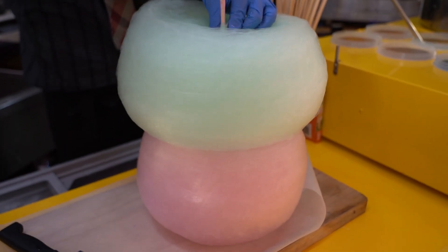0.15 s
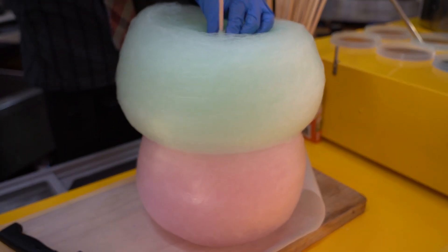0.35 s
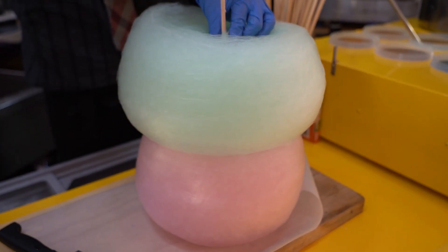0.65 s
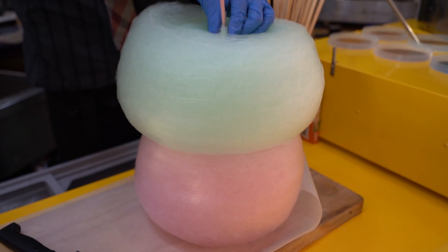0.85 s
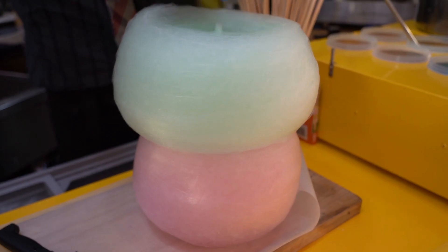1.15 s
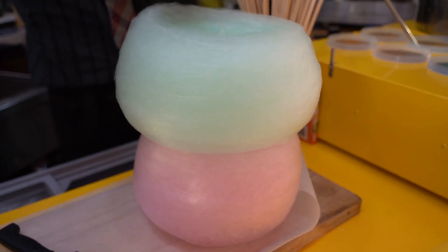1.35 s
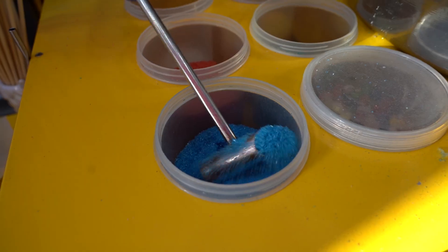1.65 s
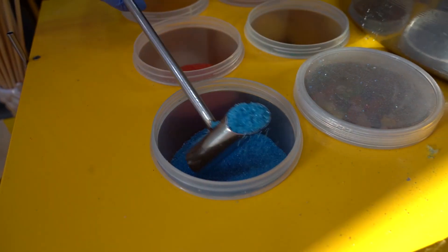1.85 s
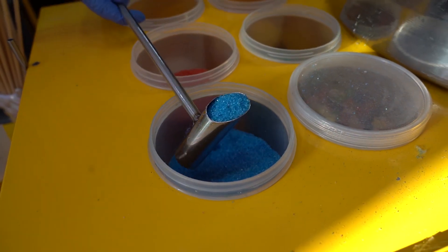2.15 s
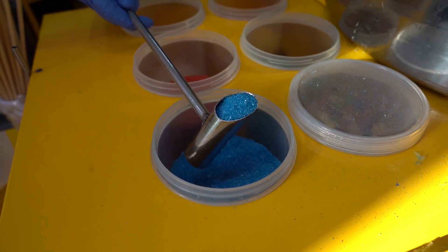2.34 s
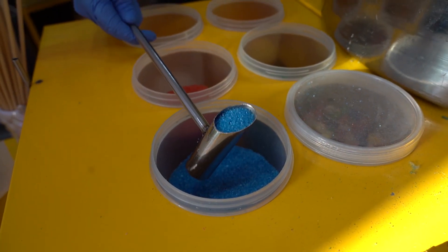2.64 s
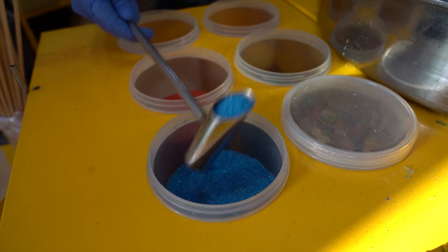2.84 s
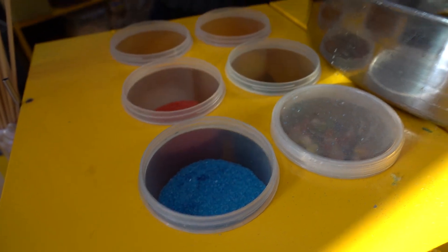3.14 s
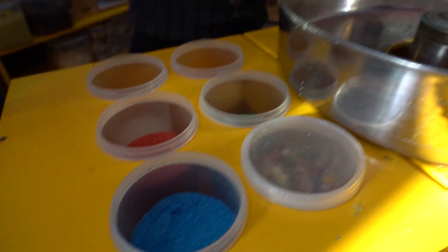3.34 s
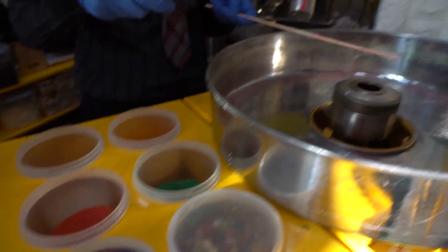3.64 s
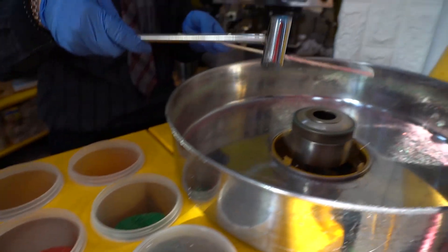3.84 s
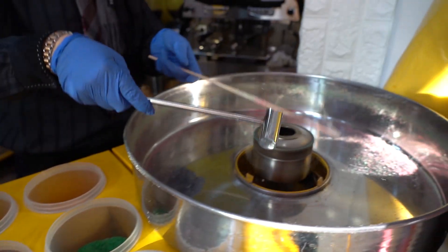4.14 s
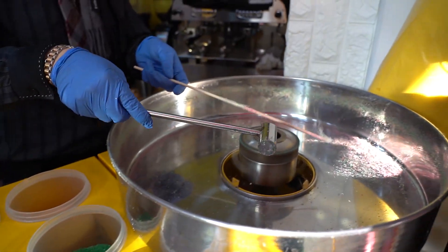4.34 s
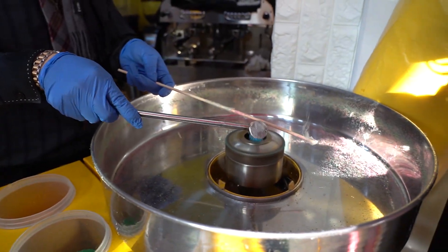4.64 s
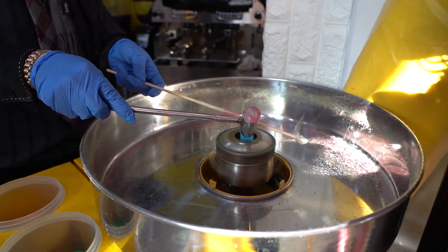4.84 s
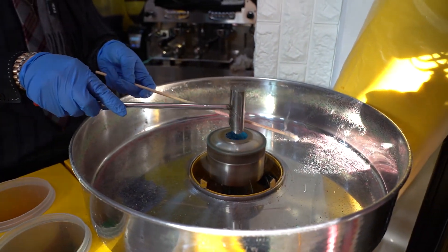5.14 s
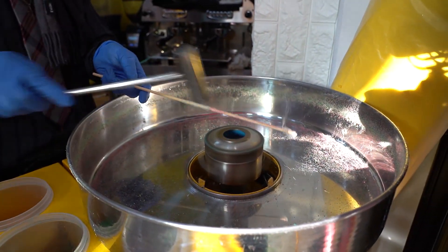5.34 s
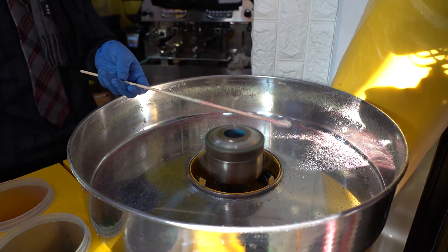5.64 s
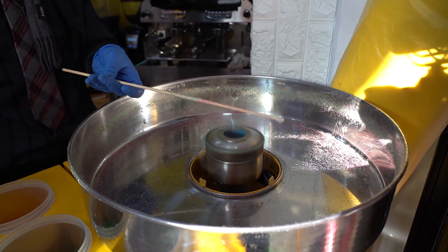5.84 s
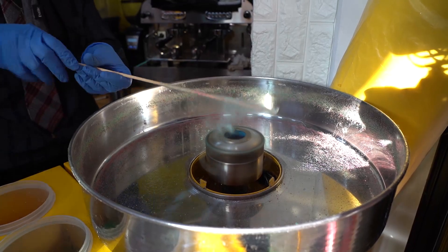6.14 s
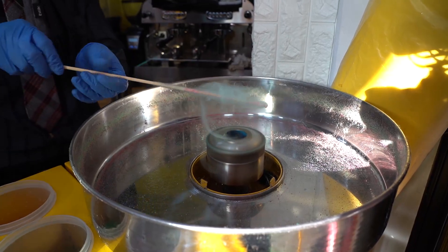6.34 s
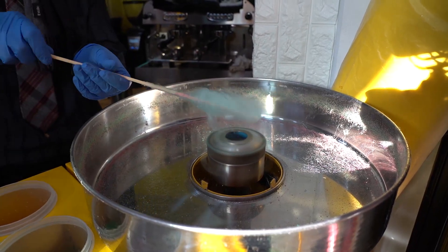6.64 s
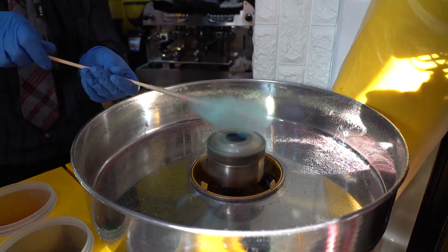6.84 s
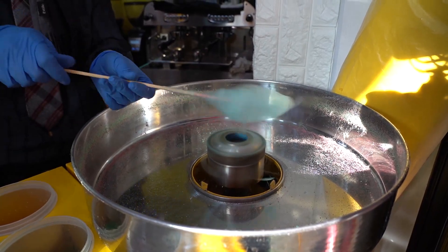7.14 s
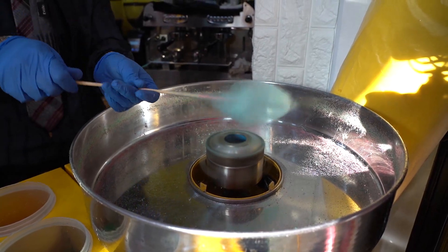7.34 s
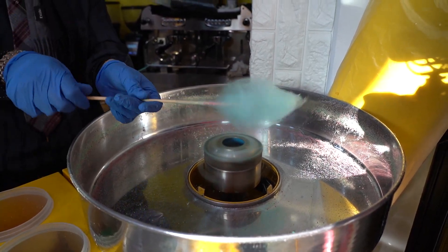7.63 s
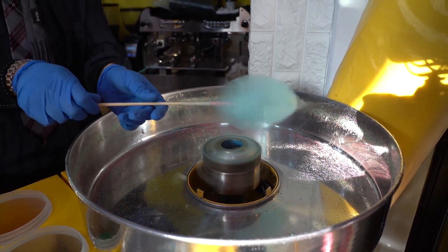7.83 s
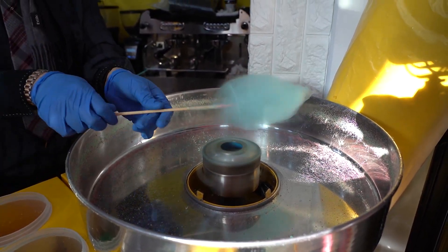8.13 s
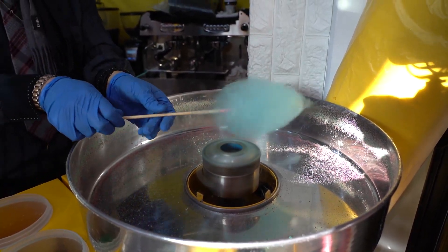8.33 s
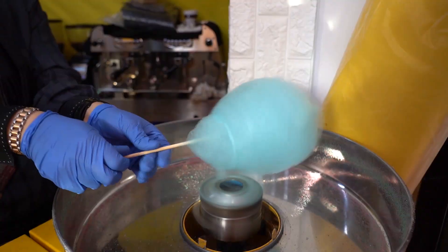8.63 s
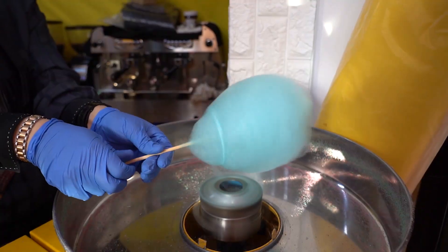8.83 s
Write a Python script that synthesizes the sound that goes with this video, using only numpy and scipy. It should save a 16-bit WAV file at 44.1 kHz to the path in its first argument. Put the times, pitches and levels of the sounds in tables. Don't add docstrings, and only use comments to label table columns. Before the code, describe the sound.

A thin, hissing whir with faint high whines runs throughout, distant at first and nearer in steps. Four hollow knocks come quickly, then small gritty clicks and one overloaded snap. Crystals patter into spinning metal, swelling to a short rush; a dull clunk follows. The machine spins on to the end, over soft stall rumble and mains hum, centred in the stereo picture.

```python
import sys
import numpy as np
from scipy import signal
from scipy.fft import rfft, irfft, next_fast_len
from scipy.io import wavfile
from scipy.ndimage import uniform_filter1d, map_coordinates

SR = 44100
rng = np.random.default_rng(int(sys.argv[2]) if len(sys.argv) > 2 else 0)


def materialize(psi):
    bounded = np.clip(np.atleast_2d(psi).T, -1, 1)
    quanta = np.round(bounded * 32767).astype(np.int16)
    wavfile.write(sys.argv[1], SR, quanta)


def gain_from_db(level_db):
    decades = np.asarray(level_db, float) / 20
    return 10 ** decades


N = 396018

# time_s, speed_rev_per_s
SPIN = [(0, 54.02), (3.5, 53.81), (4.6, 53.97), (4.9, 53.93), (5.27, 52.9)]
FREE_REV_PER_S, RECOVER_S, LAST_REV_PER_S = 55.08, 1.1, 54.51
# arrival_s, move_s
MOVES = [
    (1.66, .004),
    (3.7, .45),
    (5.2, .3),
    (6.6, .6),
    (8.497, .004),
]
CUT_S, CUT_FADE_IN_S, CUT_FADE_OUT_S = 1.657, 0.016, 0.007
# time_s, level_db
NEAR = [(0, -52), (1.65, -49.5), (1.67, -42), (3, -40.5), (3.6, -38), (8.98, -38.5)]
# freq_hz, density_db_per_hz
WHIR_COLOUR = [
    [(1500, -10), (2090, -8), (2840, -22), (3070, -8), (3550, -24), (3920, 2), (6210, -1), (15600, -19)],
    [(1500, -6.5), (2600, -10), (3520, -2), (4320, -1.5), (5800, -3.5), (8170, -11.5), (12500, -16),
     (15600, -21)],
    [(1500, -14.5), (2840, -8.5), (4120, -5), (5110, .5), (6030, -8.5), (11400, -9.5), (12500, -8),
     (15600, -18)],
    [(1500, -16.5), (4490, -7), (4860, -2), (5630, -5.5), (6090, -13.5), (7260, -13.5), (11000, -12.5),
     (15600, -17.5)],
    [(1500, -12), (2450, -13.5), (2920, -7), (3920, -4), (5060, -1.5), (6500, -10), (12700, -10),
     (15600, -15)],
    [(1500, -15), (2450, -14), (2950, -8.5), (4810, -3), (6780, -7), (7260, -11.5), (12300, -8.5),
     (15600, -18)],
]
# freq_hz, width_hz, level_db
WHIR_PEAKS = [
    [(7180, 41, -7), (7750, 24, 3), (9120, 29, 3), (9500, 28, 3), (12200, 39, -6)],
    [(6010, 28, -13), (6800, 20, 2), (9100, 25, 10), (11640, 23, -10), (11800, 24, -8)],
    [(6690, 32, 0.56), (7800, 37, -1), (7860, 32, -1), (9200, 170, 0.19), (11000, 91, -2), (12700, 63, -2)],
    [(6800, 78, 1), (8400, 58, -5), (9150, 43, 3), (9970, 52, 2), (12400, 73, 0), (12700, 66, -2)],
    [(6800, 36, 6), (7740, 140, -6), (9500, 46, 1), (10200, 180, -2), (10900, 80, -6), (12500, 500, -2),
     (13200, 62, -8)],
    [(6800, 35, -4), (7800, 31, -1), (9000, 26, -7), (9800, 110, 1), (11300, 34, 7), (12500, 45, -4)],
]
# freq_hz, density_db_per_hz
WHIR_FOOT = (840, -40)
# order_per_rev, level_db
WHINES = [
    [(56, -57), (72, -59), (83, -60), (91, -59), (106, -58.5)],
    [(63, -57), (78, -53), (83, -47), (91, -53), (99, -56), (107, -56)],
    [(56, -48), (91, -46.5), (92, -46.5), (95, -53), (98, -49), (103, -54)],
    [(88, -52), (91, -45), (92, -54), (106, -55), (183, -57)],
    [(55, -48), (75, -46), (87, -52), (90, -51), (92, -52), (98, -53)],
    [(75, -49.5), (83, -50), (85, -49), (87, -52), (90, -49)],
]
# order_per_rev, level_db
LOW_ORDERS = [(2, -56), (3, -53), (4, -55), (5, -55.5), (6, -55.5), (8, -58.5), (25, -61)]
THROB_DB, LOPSIDED_DB, EVEN_OUT_S = 0.8, 2.5, 0.4

# start_s, length_s, level_db, brightness_db
RASPS = [
    (3.433, .004, -17.5, 0.5),
    (3.4525, 0.0052, -18, 0.5),
    (3.469, 0.0084, -17.5, -6),
    (3.488, 0.0071, -23, -1),
]
# freq_hz, width_hz, level_db
RASP_BODY = [(3950, 1100, 2.5), (5640, 1900, 2.5), (8700, 2000, -5.5), (13000, 5000, -12)]
RASP_T60_S, LEAD_S, LEAD_LENGTH_S, LEAD_DB = 0.012, 0.004, 0.002, -5
SNAP_S, SNAP_DB, SNAP_LENGTH_S, SNAP_T60_S = 3.5445, -0.5, 0.0017, 0.0095
ECHO_DELAY_S, ECHO_DB, ECHO_T60_S = 0.00113, -16.5, 0.18
# freq_hz, density_db_per_hz
SNAP = [(500, -45), (900, -27), (1400, -4), (2100, -1.5), (2800, -15), (3700, 1.5), (4600, -3.5),
        (5800, -4), (8500, -11), (12600, -17.5), (16000, -20)]
# freq_hz, density_db_per_hz
SNAP_ECHO = [(470, -54), (800, -22), (1200, -22), (1700, -9), (2950, -10), (3600, -0.5), (4570, -7),
             (5510, 1.5), (6650, -10.5), (14800, -17), (16000, -27)]

# start_s, peak_db, tick_over_thud_db, boom_db, rattle_db
KNOCKS = [
    (2.3283, -21.5, -10, -1, -27),
    (2.4784, -18.5, -11, 0, -27),
    (2.632, -13.5, -12.5, -2, -27),
    (2.776, -15, -10.5, -0.5, -26.5),
    (5.7456, -12, -11, -6.5, -26),
    (5.8232, -29, -6, -6, -19),
]
# freq_hz, level_db, t60_s
TUB = [(180, -6.5, 0.034), (223, 8.5, 0.026), (315, -3, 0.037), (422, -4, 0.02), (500, -4.5, 0.036),
       (610, -5, 0.041), (706, -3, 0.041), (865, -10.5, 0.019), (946, -6, 0.057), (1100, -13.5, 0.035),
       (1218, -5.5, 0.05), (1415, -11.5, .04), (1820, -9, 0.032), (2235, -12, 0.024)]
# freq_hz, level_db, t60_s
STEEL = [(2970, -4, .007), (3780, 6, 0.006), (4800, -4.5, 0.015), (5350, -6, 0.012)]
BOOM_BELOW_HZ = 270

# freq_hz, density_db_per_hz
SUGAR = [(1470, -31), (2500, -13), (3290, -8), (4150, -2), (4510, -12), (5020, -1.5), (7420, -8),
         (12300, -4.5), (15600, -8.5)]
# time_s, peak_db
CRYSTALS = [
    (4.7197, -18),
    (4.7914, -24),
    (4.8614, -24),
    (4.9074, -23),
    (5.2654, -23),
]
POUR_START_S, POUR_RISE_S, STREAM_DB = 4.65, 0.22, -36
RUSH_S, RUSH_DB, RUSH_SWELL_DB_PER_S, POUR_STOP_DB_PER_S = 5.2, -29.5, 45, 120

# freq_hz, density_db_per_hz
STALL = [(41, -34), (70, -5), (112, -3.5), (133, -3.5), (155, 0), (190, -3.5), (207, -3), (295, -3),
         (327, -1.5), (872, -8.5), (1310, -4.5), (1720, -12.5), (4000, -14), (5200, -49), (8800, -120)]
# freq_hz, density_db_per_hz
DEEP = [(18, -20), (27, 5), (50, 4), (80, -2), (120, -29)]
DEEP_DB = [-55, -61, -61, -60, -62, -52]
RUMBLE_DB, RUMBLE_FOLLOWS = -42, 0.18
MAINS_HZ, MAINS_DB = 58.6, -51.0
# peak_s, level_db
GUSTS = [(.07, -30.5), (.71, -33.5), (1.3, -33.5), (1.72, -28), (2.18, -33.5), (2.46, -34.5), (2.8, -28),
         (3.2, -32), (4.17, -29), (4.65, -31.5), (5.11, -30.5), (5.55, -31.5), (5.95, -28.5), (6.49, -34),
         (6.72, -30.5), (7.7, -33), (8.78, -36)]
GUST_RISE_DB_PER_S, GUST_FALL_DB_PER_S, CALM_DB = 56, 36, -41.5


def spinner(whir_db, here):
    t = np.arange(N) / SR
    since_s = np.maximum(t - SPIN[-1][0], 0)
    recovery = (FREE_REV_PER_S - SPIN[-1][1]) * (1 - np.exp(-since_s / RECOVER_S))
    speed = in_time(SPIN)[0] + recovery
    turns = np.cumsum(np.where(t < MOVES[-1][0], speed, LAST_REV_PER_S)) / SR

    air, whir = rng.standard_normal(N), 0
    for share, spectrum, peaks in zip(here, WHIR_COLOUR, WHIR_PEAKS):
        source = turn_pattern(turns, keep=0.88, lumpy_db=2.0) + gain_from_db(-9) * air
        whir = whir + np.sqrt(share) * colour(source, [WHIR_FOOT] + list(spectrum), peaks, lift=0.31)
    whir = gain_from_db(whir_db + 0.36 * drift(5)) * whir

    swells = [gain_from_db(1.1 * drift(1.505)) for _ in range(6)]
    for share, orders in zip(here, WHINES):
        on = share > 0
        for (order, db), swell in zip(orders, swells):
            whine = np.sin(2 * np.pi * (round(order) * turns[on] + rng.random()))
            whir[on] += share[on] * gain_from_db(db) * swell[on] * whine

    loaded = np.clip((t - RUSH_S) / 0.1, 0, 1) * np.exp(-since_s / EVEN_OUT_S)
    throb = gain_from_db((THROB_DB + LOPSIDED_DB * loaded) * np.cos(2 * np.pi * (turns + 0.25)))
    hum = np.zeros(N)
    for order, db in LOW_ORDERS:
        level = gain_from_db(db + 1.0 + 2.24 * drift(2.51))
        hum += level * np.sin(2 * np.pi * (round(order) * turns + rng.random()))
    return throb * whir + hum


def turn_pattern(turns, keep, lumpy_db):
    size, frames = 4096, 40
    shape = (1, frames, 330)
    harmonics = rng.standard_normal(shape) + 1j * rng.standard_normal(shape)
    keep = np.clip(keep, 0, 0.99)
    settled = harmonics[:, :1] * keep / np.sqrt(1 - keep ** 2)
    harmonics = signal.lfilter([1], [1, -keep], harmonics, axis=1, zi=settled)[0]
    harmonics = harmonics / np.abs(harmonics) ** 0.2
    lumps = irfft(rng.standard_normal(7) + 1j * rng.standard_normal(7), size)
    lumps = rms_one(lumps - lumps.mean())
    table = rms_one(irfft(harmonics[0], size)) * gain_from_db(lumpy_db * lumps)
    where = [np.linspace(0, frames - 1, N), turns % 1 * size]
    return rms_one(map_coordinates(table, where, order=1, mode="grid-wrap"))


def switch():
    grit = rng.standard_normal(N) * gain_from_db(3.5 * drift(1300))
    body = []
    for hz, width_hz, db in RASP_BODY:
        body.append(gain_from_db(db) * rms_one(band(grit, hz - width_hz / 2, hz + width_hz / 2)))
    rasp = np.zeros(N)
    for s, length_s, db, bright_db in RASPS:
        catch = gain_from_db(LEAD_DB) * burst(s - LEAD_S, LEAD_LENGTH_S, RASP_T60_S)
        slip = burst(s, length_s, RASP_T60_S) + catch
        rasp += gain_from_db(db) * slip * (body[0] + gain_from_db(bright_db) * sum(body[1:]))

    snap = gain_from_db(SNAP_DB) * burst(SNAP_S, SNAP_LENGTH_S, SNAP_T60_S) * colour(rng.standard_normal(N), SNAP)
    thin = signal.butter(2, 900, "high", fs=SR, output="sos")
    snap = signal.sosfilt(thin, snap)
    echo = burst(SNAP_S + ECHO_DELAY_S, 0, ECHO_T60_S) * colour(rng.standard_normal(N), SNAP_ECHO)
    return 0.55 * rasp + snap + gain_from_db(ECHO_DB) * echo


def knocks():
    out, size = np.zeros(N), SR // 3
    t = np.arange(size) / SR
    light = signal.butter(4, 160, "high", fs=SR, output="sos")
    click = 1. * (t == 0)
    for s, db, tick_db, boom_db, rattle_db in KNOCKS:
        noise = rng.standard_normal((len(TUB), size))
        spread_db = rng.normal(0, 0.5, len(TUB))
        pushes = click + gain_from_db(rattle_db) * noise * gain_from_db(-60 * t / 0.16)
        thud = np.zeros(size)
        for (hz, mode_db, t60_s), extra_db, push in zip(TUB, spread_db, pushes):
            thud += gain_from_db(mode_db + extra_db + boom_db * (hz < BOOM_BELOW_HZ)) * ring(push, hz, t60_s)
        thud = signal.sosfilt(light, thud)
        tick = sum(gain_from_db(mode_db) * ring(click, hz, t60_s) for hz, mode_db, t60_s in STEEL)
        shiver = band(noise[0], 1500, 4500) * gain_from_db(-60 * t / 0.07)
        tick = tick + gain_from_db(-9 - 1.1 * boom_db) * shiver
        out[round(s * SR):][:size] += gain_from_db(db) * (thud / np.abs(thud).max() + gain_from_db(tick_db) * tick)
    return out


def sugar():
    hits = rng.random(N) < 8000 / SR
    grains = hits * rng.standard_normal(N) * gain_from_db(2.0 * np.minimum(rng.exponential(1, N), 3))
    lone = np.zeros(N)
    for s, db in CRYSTALS:
        lone[round((s + 0.001) * SR)] = gain_from_db(db - 4)
    rush_db = peak_db(RUSH_S, RUSH_DB, RUSH_SWELL_DB_PER_S, POUR_STOP_DB_PER_S)
    stream_db = peak_db(RUSH_S, STREAM_DB, 0, POUR_STOP_DB_PER_S)
    tipped = np.clip((np.arange(N) / SR - POUR_START_S) / POUR_RISE_S, 0, 1)
    pour = tipped * gain_from_db(np.maximum(rush_db, stream_db) - 2) * colour(grains, SUGAR)
    return pour + ring(lone, 5200, 0.004) + ring(lone, 9500, 0.002)


def stall(rumble_db, deep_db, sway_db):
    rumble = gain_from_db(rumble_db + 0.5 * drift(4)) * colour(rng.standard_normal(N), STALL)
    deep = gain_from_db(deep_db + 5) * colour(rng.standard_normal(N), DEEP)
    mains = gain_from_db(MAINS_DB + 2.0 * drift(3)) * np.sin(2 * np.pi * MAINS_HZ * np.arange(N) / SR)
    sway = np.sin(2 * np.pi * np.cumsum(13.2 + 1.15 * drift(3)) / SR)
    return rumble + deep + mains + gain_from_db(uniform_filter1d(sway_db, size=2000) + 3) * sway


def places():
    t = np.arange(N) / SR
    moved = [np.clip(0.5 + (t - s) / move_s, 0, 1) for s, move_s in MOVES]
    return -np.diff([np.ones(N)] + moved + [np.zeros(N)], axis=0)


def rms_one(x):
    return x / np.sqrt(np.mean(x ** 2) + 1e-20)


def in_time(rows):
    s, *columns = np.transpose(rows)
    return [np.interp(np.arange(N) / SR, s, c) for c in columns]


def colour(x, spectrum, peaks=(), lift=0.):
    size = next_fast_len(N)
    hz = np.arange(size // 2 + 1) * SR / size + 1
    spectrum_hz, spectrum_db = np.transpose(spectrum)
    gain = gain_from_db(np.interp(np.log(hz), np.log(spectrum_hz), spectrum_db))
    for centre_hz, width_hz, db in peaks:
        top = lift * gain_from_db(db) * gain.max()
        gain = gain + top / (1 + (2 * (hz - centre_hz) / max(width_hz, 40)) ** 2)
    return rms_one(irfft(rfft(x, size) * gain, size)[:N])


def band(x, low_hz, high_hz):
    return signal.sosfilt(signal.butter(2, [low_hz, high_hz], "band", fs=SR, output="sos"), x)


def drift(rate_hz):
    knots = rng.standard_normal(int(N / SR * rate_hz) + 3)
    return rms_one(map_coordinates(knots, [np.arange(N) / SR * rate_hz], order=3))


def ring(x, hz, t60_s):
    r, w = gain_from_db(-60 / (t60_s * SR)), 2 * np.pi * hz / SR
    return signal.lfilter([0, np.sin(w)], [1, -2 * r * np.cos(w), r * r], x + 1e-18)


def burst(start_s, length_s, t60_s):
    t = np.arange(N) / SR - start_s
    return (t >= 0) * gain_from_db(-60 * np.clip(t - length_s, 0, 3 * t60_s) / t60_s)


def peak_db(s, db, rise_db_per_s, fall_db_per_s):
    t = np.arange(N) / SR - s
    return db - np.where(t < 0, -rise_db_per_s * t, fall_db_per_s * t)


def scene():
    whir_db, here = in_time(NEAR)[0], places()
    rumble_db = RUMBLE_DB + RUMBLE_FOLLOWS * (whir_db - whir_db.max())
    gusts = [peak_db(s, db, GUST_RISE_DB_PER_S, GUST_FALL_DB_PER_S) for s, db in GUSTS]
    sway_db = np.maximum(np.max(gusts, axis=0), CALM_DB)
    mix = spinner(whir_db, here) + switch() + knocks() + sugar()
    mix = mix + stall(rumble_db, np.dot(DEEP_DB, here), sway_db)
    t = np.arange(N) / SR - CUT_S
    fade = np.clip(np.where(t < 0, -t / CUT_FADE_OUT_S, t / CUT_FADE_IN_S), 0, 1)
    return np.stack([mix, mix]) * fade


def low_pass(x):
    return signal.sosfilt(signal.butter(12, 16270, fs=SR, output="sos"), x)


def record(dry):
    top = signal.cheby2(24, 45, 15820, fs=SR, output="sos")
    mix = signal.sosfilt(top, np.clip(dry, -1, 1))
    return low_pass(mix)


dry = scene()
out = record(dry)
materialize(out)
```